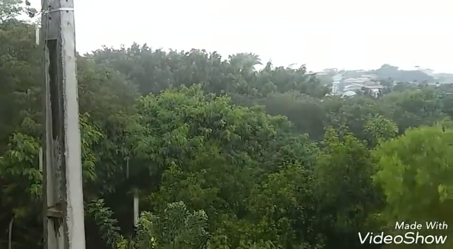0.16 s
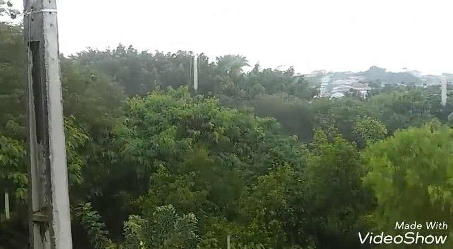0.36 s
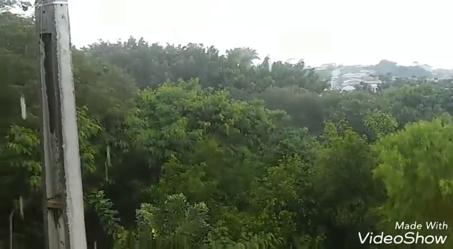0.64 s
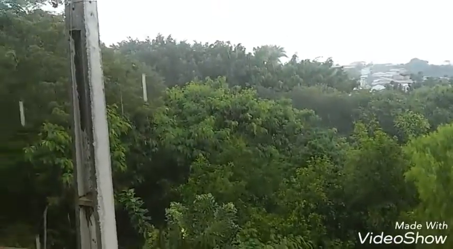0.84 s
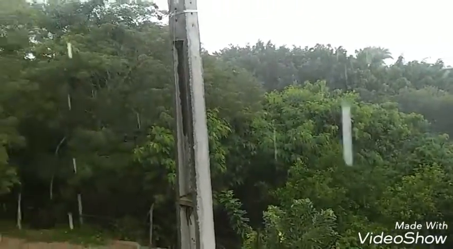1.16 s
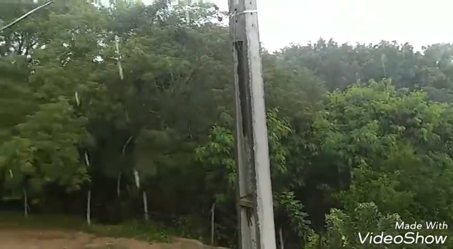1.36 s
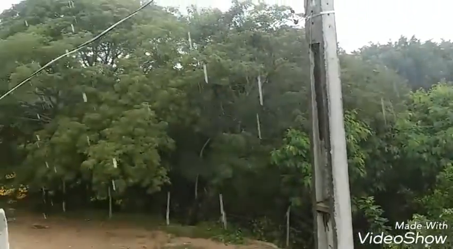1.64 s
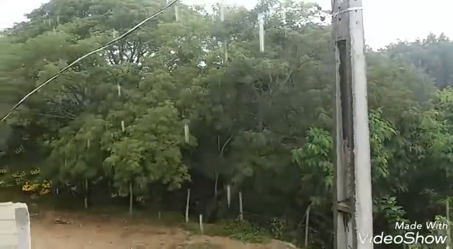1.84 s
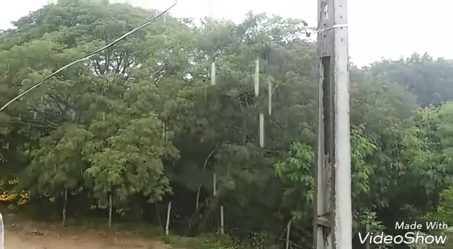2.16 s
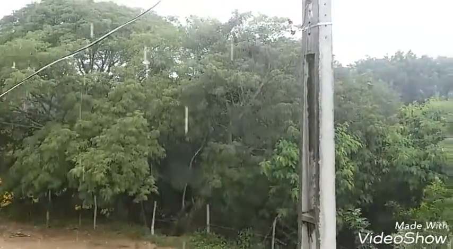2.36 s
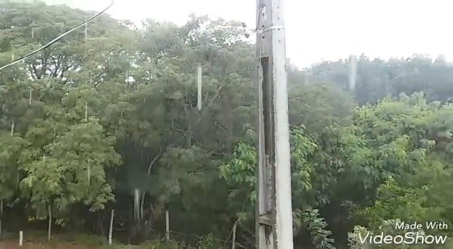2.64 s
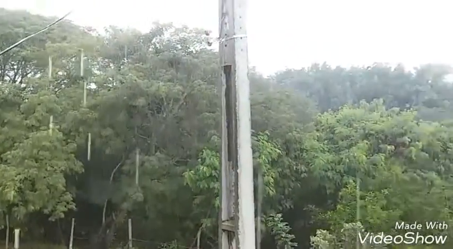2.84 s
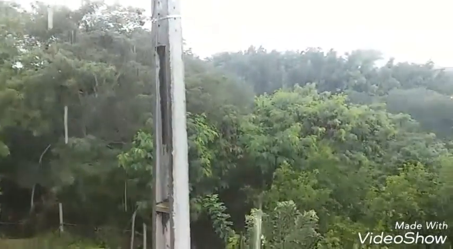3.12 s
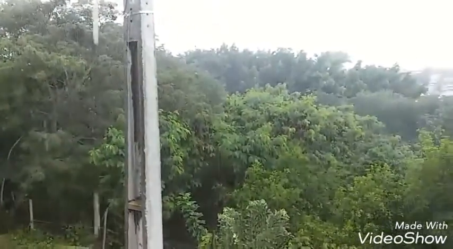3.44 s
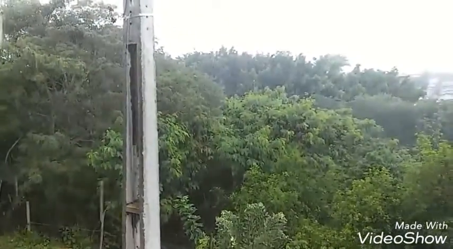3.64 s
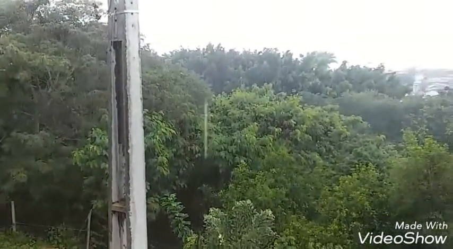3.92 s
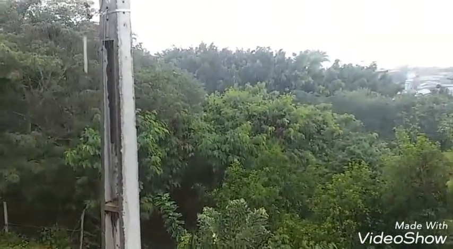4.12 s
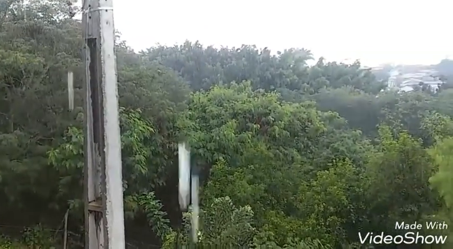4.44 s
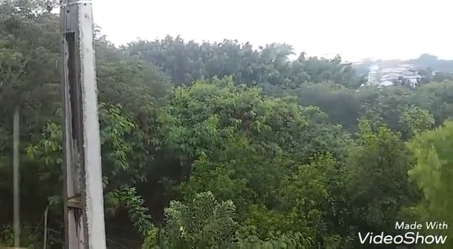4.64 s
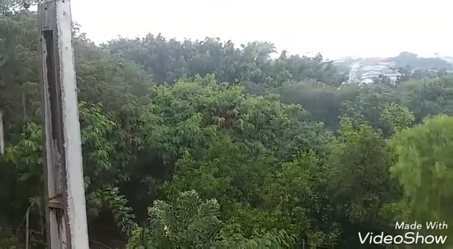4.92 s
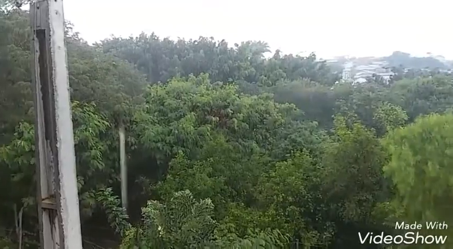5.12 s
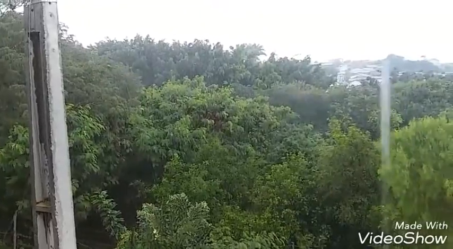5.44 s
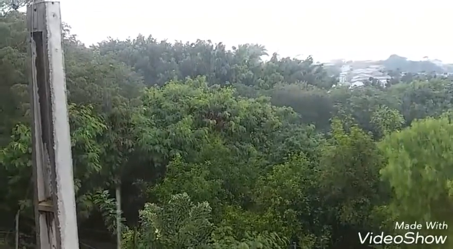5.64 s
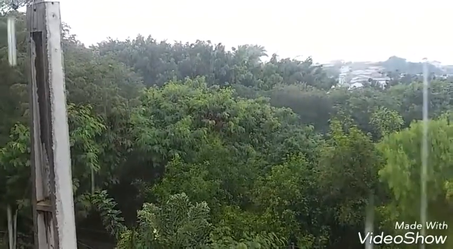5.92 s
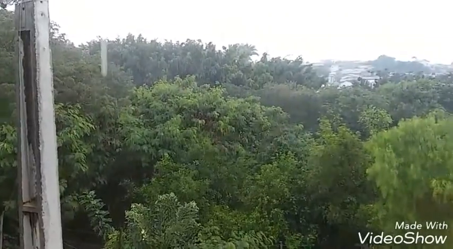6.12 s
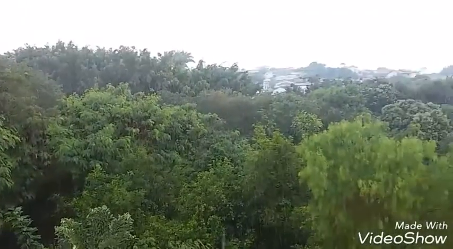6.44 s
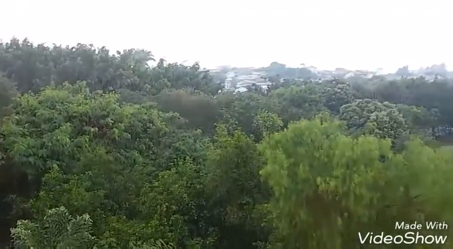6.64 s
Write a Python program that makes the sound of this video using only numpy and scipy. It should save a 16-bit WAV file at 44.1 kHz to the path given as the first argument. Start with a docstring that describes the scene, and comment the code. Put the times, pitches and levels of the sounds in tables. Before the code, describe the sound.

Rainwater pours off the eaves onto paving close to a microphone sheltered under the roof. From the start, a bright sizzling spray surges several times a second, mixed with pattering drops, sharp close ticks and occasional tiny plinks in puddles. Behind it, heavy rain on trees, roofs and a street forms a steady wash, with a gutter gurgling faintly throughout.

Big drops slap and splash irregularly, the sharpest at about 2.6 seconds. After 3 seconds the continuous spray thins, so separate gushes and drops stand out, with clusters of slaps around 3.9, 4.4 and 4.9 to 5.2 seconds, and another hit near 5.9.

Wind rumbles softly on the microphone, most noticeably from 1.4 to 2 seconds and from 3 to 3.5, then more lightly around 5. It calms after 6 seconds, while the rain and dripping carry on to the end, just short of 7 seconds.

```python
"""Rainwater pours off the eaves onto the paving close by, heard in mono from under the roof.
It comes in surges: larger drops patter, and fine droplets sizzle as spray and mist.
Big drops slap and splash, the closest ones tick, and bubbles trapped in puddles plink.
Behind this, heavy rain on trees, roofs and a street blends into a wash, and a gutter gurgles.
Gusts of wind rumble softly on the microphone."""
import sys
import numpy as np
from scipy import signal
from scipy.fft import rfft, irfft, next_fast_len
from scipy.io import wavfile

SR = 44100
rng = np.random.default_rng(int(sys.argv[2]) if len(sys.argv) > 2 else 0)


def persist_wave(psi):
    """Save psi, clipped to +-1, as 16-bit WAV."""
    counts = np.round(np.clip(psi, -1, 1) * 32767).astype(np.int16)
    wavfile.write(sys.argv[1], SR, np.atleast_2d(counts).T)


N = 298557
TIME = np.arange(N) / SR

# The steady stream from the eaves. Each row: time in seconds, level of its spray in dB.
STREAM_LEVELS = [(0.0, -18.5), (0.5, -18), (1.2, -23), (1.65, -21.5), (2.2, -20), (2.72, -18.5),
                 (3.0, -21.5), (3.28, -32.5), (4.2, -29), (4.9, -26), (5.35, -31.5), (5.6, -26.5),
                 (6.2, -41), (6.77, -33)]
# Gushes that spill over the eaves. Each row: start in seconds, then spray, mist and patter levels in dB.
GUSHES = [(.07, -28, -26, -25), (.22, -20.5, -27, -35), (.33, -27, -34, -27), (.79, -22.5, -32, -29),
          (.88, -25, -29, -30), (.98, -21.5, -38, -22.5), (1.06, -30, -35, -25), (1.16, -42, -36, -37),
          (1.27, -17, -44, -48), (1.47, -23.5, -40, -29), (1.72, -35, -32, -23), (1.825, -18, -32, -29),
          (1.96, -22.5, -31, -24), (2.10, -26, -27, -27), (2.39, -27, -34, -24.5), (2.47, -21.5, -34, -23),
          (2.565, -20.5, -25, -36), (2.785, -21, -26, -31), (3.02, -25.5, -40, -20),
          (3.37, -26.5, -47, -50), (3.43, -37, -40, -25), (3.57, -28.5, -33, -29.5), (3.66, -33, -44, -30),
          (3.76, -44, -48, -27), (3.878, -23.5, -36, -24), (3.902, -19, -31, -25), (4.125, -26.5, -32, -26),
          (4.355, -22.5, -38, -20.5), (4.44, -21, -37, -42), (4.55, -28, -30, -28), (4.71, -23, -29, -23),
          (4.78, -26, -36, -26.5), (4.87, -28, -31, -29), (5.01, -22, -31, -30), (5.205, -31, -33, -25),
          (5.31, -57, -39, -28), (5.42, -26.5, -33, -35), (5.64, -49, -33, -25.5), (5.79, -27, -30, -27.5),
          (5.85, -24.5, -30, -39), (6.01, -25.5, -31, -26.5), (6.25, -27, -29, -27), (6.33, -25, -29, -32),
          (6.49, -26, -34, -31), (6.655, -23, -42, -28.5), (6.74, -22, -33, -35)]
# The tone of the bright spray. Each row: frequency in Hz, relative level in dB.
SPRAY_TONE = [(3000, -12.5), (5000, -14), (6500, -8.5), (7800, -3.5), (9000, 0), (10500, -4),
              (12500, -11.5), (15500, -22)]
# The tone of the finest mist. Each row: frequency in Hz, relative level in dB.
MIST_TONE = [(9000, -8), (11500, 2), (13000, 3.5), (15500, -4.5)]
# The tone of the larger, pattering drops. Each row: frequency in Hz, relative level in dB.
PATTER_TONE = [(1300, -10.5), (1800, -16), (2150, -6), (2600, -1.5), (3000, -4), (3600, -6), (4200, -5.5),
               (5000, -8), (7000, -10.5)]
# Big drops hitting wet ground. Each row: start in seconds, peak of the crack in dB, pitch in Hz,
# width in octaves, level of the splash in dB, fade time of the splash in seconds.
BIG_DROPS = [(.235, -19, 3520, 0.32, -31.5, .06), (0.333, -19, 3600, .66, -35, .06),
             (.348, -19, 3900, .9, -35, .07), (0.638, -14, 5800, .35, -27, .05),
             (.8325, -16, 5900, .45, -38, .06), (0.886, -25, 2730, 0.35, -28, 0.095),
             (1.033, -17, 3920, 0.61, -26.5, .07), (1.076, -16, 3900, 1.1, -30, .05),
             (1.169, -27, 2600, 0.37, -29, 0.065), (1.341, -9, 7040, 0.66, -24, 0.066),
             (1.679, -22, 2400, .4, -30, .06), (1.7355, -15, 4700, 0.51, -28, 0.045),
             (1.869, -12, 6100, 0.33, -34, .06), (2.017, -11, 3800, 0.9, -25.5, .04),
             (2.398, -20, 4530, 0.4, -26.5, 0.11), (2.415, -11, 6000, .5, -29, 0.055),
             (2.478, -13, 2890, 0.45, -28.5, 0.068), (2.58, -1.5, 5600, 0.48, -20, 0.046),
             (2.805, -22, 2800, 0.36, -29, 0.054), (3.036, -13, 3600, .6, -29, 0.055),
             (3.066, -22, 3600, 1.1, -35, .06), (3.096, -18, 3300, 1.2, -29.5, 0.055),
             (3.1095, -18, 2580, 1.1, -26, .07), (3.440, -17, 3300, 0.97, -39, .06),
             (3.653, -15, 2800, 0.75, -27, 0.089), (3.914, -13, 4550, 0.52, -25, .07),
             (3.9444, -11, 3900, 0.48, -26, 0.062), (4.349, -16, 5800, .25, -27, .04),
             (4.364, -11, 3000, 0.96, -20.5, 0.041), (4.382, -11, 4000, 1.2, -26, 0.037),
             (4.553, -30, 1700, 0.29, -28.5, 0.078), (4.721, -17, 3300, 1, -27.5, 0.092),
             (4.787, -18, 2300, 0.29, -26.5, 0.079), (4.8885, -7, 2070, 0.72, -21.5, 0.064),
             (4.907, -12, 2160, 0.5, -26, 0.056), (5.0565, -11, 5550, 0.32, -25, 0.044),
             (5.063, -13, 5900, 0.6, -31, 0.088), (5.116, -16, 2800, 0.71, -30, 0.063),
             (5.1292, -20, 2370, 0.7, -32, 0.051), (5.1952, -12, 4750, 0.46, -22.5, 0.05),
             (5.341, -14.5, 4640, .6, -35, .04), (5.4485, -22, 2940, 0.3, -37, .04),
             (5.8529, -10.5, 3050, 0.75, -27, 0.022), (6.258, -15, 3430, 1.1, -32, 0.054),
             (6.285, -29, 2580, 0.3, -31, .08), (6.5105, -24, 2600, 0.3, -37, .07)]
# Drops that trap a bubble in a puddle. Each row: start in seconds, peak in dB, pitch in Hz,
# fade time in seconds.
PUDDLE_BUBBLES = [(1.679, -20, 2290, .004), (1.7357, -13.5, 5000, .002), (2.023, -20, 2830, .004),
                  (2.399, -26, 4210, .004), (3.6535, -14, 2580, .002), (4.3654, -10.5, 3210, .004),
                  (4.721, -24, 5200, .003), (5.0572, -16, 5540, .002), (5.1957, -14, 4460, .002),
                  (5.197, -14, 3950, .003), (5.4485, -21, 2930, 0.0065), (5.8535, -19, 2960, .003),
                  (6.258, -21, 4200, .003), (6.5105, -22.5, 2660, .004)]
# The closest drops. Each row: start in seconds, peak of the click in dB, pitch in Hz.
CLOSE_DROPS = [(.0737, -9, 9300), (.2971, -11, 9300), (.562, -5, 8900), (.5925, -11, 9300),
               (.7353, -16, 9500), (0.7906, -8, 10000), (.8007, -8, 8700), (.8131, -9, 9300),
               (1.0841, -3, 10000), (1.0937, -1, 8200), (1.2027, -15, 9300), (1.279, -5, 8100),
               (1.2984, -7, 8200), (1.4223, -9, 9100), (1.487, -4, 9700), (1.7487, -12, 9300),
               (1.8224, -4, 9400), (1.8567, -8, 9400), (1.9223, -8, 9200), (2.1255, -3, 11000),
               (2.1394, -4, 9500), (2.390, -5, 9400), (2.509, -13, 9300), (2.5617, -3, 8300),
               (2.689, -2, 8800), (2.7031, -5, 9600), (2.992, -6, 8000), (3.4405, -10, 8500),
               (3.749, -10, 9750), (3.9086, -12, 9800), (3.9164, -11, 8000), (4.1647, -10, 8300),
               (4.2826, -10, 8900), (4.381, -10, 8900), (4.4672, 0, 8900), (4.4693, -2, 9200),
               (4.8595, -5, 9800), (4.9492, -8, 9700), (5.0042, -5, 9000), (5.231, -9, 9000),
               (5.2354, -10, 9050), (5.8545, -2, 9100), (5.863, -5, 8700), (6.531, -8, 9400),
               (6.5933, -12, 9400), (6.6728, -6, 8360)]
# How loud the far rain and the gutter are. Each row: time in seconds, relative level in dB.
FAR_RAIN_LEVELS = [(0.0, -37.5), (1.3, -37), (2.3, -37), (3.5, -37.3), (4.1, -38.5), (5.05, -38.5),
                   (5.9, -39.5), (6.3, -37.5), (6.77, -38.5)]
# The tone of the far rain. Each row: frequency in Hz, relative level in dB.
FAR_RAIN_TONE = [(100, -1.5), (190, -5), (280, -5), (380, -6.5), (520, -5), (980, -3), (1270, -8),
                 (1600, -4.5), (2600, -3.5), (4000, -2.5), (6000, -5.5), (9000, -1), (12000, -3.5),
                 (15500, -7)]
# The breeze between gusts, slowly calming. Each row: time in seconds, level in dB.
BREEZE_LEVELS = [(0, -42.5), (2.5, -47), (5.9, -46.5), (6.2, -53), (6.77, -55)]
# Gusts of wind. Each row: start in seconds, time held in seconds, level in dB.
WIND_GUSTS = [(.05, .55, -48), (1.12, .03, -39), (1.2, .01, -35), (1.42, 0.069, -26.5), (1.6, .03, -31),
              (1.7, .07, -32.5), (1.85, 0.038, -36), (1.97, 0.056, -34), (2.15, 0.13, -41),
              (2.42, .25, -37.5), (2.99, 0.091, -33.5), (3.14, 0.033, -29.5), (3.25, 0.07, -29),
              (3.4, 0.06, -33), (3.53, 0.11, -37), (3.67, 0.021, -38), (3.94, 0.05, -42),
              (4.11, 0.046, -39), (4.27, .06, -42), (4.4, .03, -41), (4.76, 0.091, -44),
              (4.86, 0.056, -35.5), (5.02, 0.085, -35), (5.53, .15, -43), (5.78, 0.056, -39)]
# The tone of wind on the microphone. Each row: frequency in Hz, relative level in dB.
WIND_TONE = [(20, -5.5), (35, 5), (55, 2.5), (78, 1.5), (98, 0), (125, -4), (200, -18.5), (350, -25)]


def runoff():
    """Water from the eaves patters on the paving, plinks in puddles and breaks into spray and mist."""
    stream_db = curve(STREAM_LEVELS)
    _, spray_db, mist_db, patter_db = np.transpose(GUSHES)
    spray_gain = gush_gain(stream_db, spray_db, fall_s=0.14)
    mist_gain = gush_gain(stream_db - 9.5, mist_db, fall_s=0.14)
    # The patter follows the stream only a little, and dies away sooner than the fine spray.
    steady_patter_db = -30 + 0.29 * (stream_db - stream_db.mean())
    patter_gain = gush_gain(steady_patter_db, patter_db, fall_s=0.099)

    sizzle = ringing_drops(per_s=5500, spread_db=2, low_hz=4650, high_hz=15000,
                           octaves=0.29, patchy_db=0.7, pitches=8)
    fine_drops = droplets(per_s=14000, spread_db=1) + from_db(-7.5) * sizzle
    fine_drops *= from_db(1.05 * drift(37))   # the spray flickers
    splashes = small_splashes(per_s=200, spread_db=0.35, fall_s=0.028, low_hz=1905, high_hz=6410,
                              octaves=0.32, pitches=11)
    plinks = ringing_drops(per_s=260, spread_db=-0.5, low_hz=1700, high_hz=5800,
                           octaves=0.13, patchy_db=5.5, pitches=14)
    mist = shape_tone(droplets(per_s=5500, spread_db=4), MIST_TONE)
    stray_ticks = unit_power(band(droplets(per_s=77, spread_db=-3.5), hz=9500, octaves=1))
    spray = from_db(-2.5) * shape_tone(fine_drops, SPRAY_TONE) + from_db(-18) * stray_ticks
    patter = from_db(-5.5) * shape_tone(splashes + from_db(-12.5) * plinks, PATTER_TONE)
    return spray_gain * spray + mist_gain * mist + patter_gain * patter


def gush_gain(steady_db, levels_db, fall_s, rise_s=0.012, hold_s=0.055):
    """The loudness of the stream over time, with each gush landing on top of it."""
    events = [(row[0], hold_s, db) for row, db in zip(GUSHES, levels_db)]
    return surges(steady_db, events, rise_s, fall_s)


def small_splashes(per_s, spread_db, fall_s, low_hz, high_hz, octaves, pitches):
    """Each small splash on the paving is a sudden shower of droplets near one pitch that soon fades."""
    out = 0
    kept_per_sample = np.exp(-1 / (fall_s * SR))
    for hz in np.geomspace(low_hz, high_hz, pitches):
        hit_power = droplets(per_s / pitches, spread_db) ** 2 + 1e-18
        fading_power = signal.lfilter([1], [1, -kept_per_sample], hit_power)
        showers = droplets(per_s=900, spread_db=0.5) * np.sqrt(fading_power)
        out += unit_power(band(showers, hz, octaves, order=3)) * np.sqrt(hz)
    return unit_power(out)


def slaps(crack_s=0.00087, splash_rise_s=0.0022, spatter_db=-5, spatter_s=0.038):
    """A big drop cracks and spatters widely, then its splash rains back near the pitch of the crack."""
    out, t = np.zeros(N + SR), TIME[:SR // 3]
    grains = droplets(per_s=2000, spread_db=2)
    for start_s, peak_db, hz, octaves, splash_db, splash_s in BIG_DROPS:
        at = int(start_s * SR)
        shower = grains.take(at + np.arange(len(t)), mode="wrap")
        burst = rng.choice([-1, 1], len(t)) * np.exp(-t / crack_s)
        crack = unit_peak(band(burst, hz, octaves))
        splash = unit_power(band(shower, hz, 1.2 * octaves, order=3))
        splash *= (1 - np.exp(-t / splash_rise_s)) * np.exp(-t / splash_s)
        spatter = unit_power(band(shower[::-1], 1.08 * hz, octaves + 1)) * np.exp(-t / spatter_s)
        splash += from_db(spatter_db) * spatter
        out[at:at + len(t)] += from_db(peak_db) * crack + from_db(splash_db) * splash
    return out[:N]


def ticks(octaves=0.46, crackle_gain=0.087, crackle_s=0.00078, mist_db=-22.5, mist_s=0.044):
    """A close drop on hard ground makes a bright click, an instant of crackle and a puff of mist."""
    out, t = np.zeros(N + SR), TIME[:SR // 8]
    impact = t == 0   # a single-sample spike
    for start_s, peak_db, hz in CLOSE_DROPS:
        at = int(start_s * SR)
        crackle = crackle_gain * rng.standard_normal(len(t)) * np.exp(-t / crackle_s)
        click = unit_peak(band(impact + crackle, hz, octaves))
        mist = unit_power(band(rng.standard_normal(len(t)), hz, octaves)) * np.exp(-t / mist_s)
        out[at:at + len(t)] += from_db(peak_db) * (click + from_db(mist_db) * mist)
    return out[:N]


def bubbles(rows, rise_s=0.00035, glide_per_s=3.1):
    """Each trapped bubble rings briefly, and its pitch climbs as it nears the surface."""
    out, t = np.zeros(N + SR), TIME[:SR // 8]
    for start_s, peak_db, hz, fade_s in rows:
        at = int(start_s * SR)
        cycles = hz * t * (1 + glide_per_s * t / 2)
        ring = np.sin(2 * np.pi * cycles) * (1 - np.exp(-t / rise_s)) * np.exp(-t / fade_s)
        out[at:at + len(t)] += from_db(peak_db) * unit_peak(ring)
    return out[:N]


def far_rain(boost_db=8):
    """Countless distant drops blend into a wash; water running on roofs and street burbles in it."""
    burble = ringing_drops(per_s=9000, spread_db=1, low_hz=170.1, high_hz=2020,
                           octaves=0.16, patchy_db=6, pitches=22)
    drops = droplets(per_s=16000, spread_db=2) + from_db(-5) * burble
    return from_db(curve(FAR_RAIN_LEVELS) + boost_db) * shape_tone(drops, FAR_RAIN_TONE)


def gutter(per_s=70, low_hz=379.5, high_hz=1908, fade_cycles=10.5):
    """Running water gurgles with bubbles at random moments; the large, low ones ring longest."""
    moment, loudness, pitch = rng.random((int(per_s * N / SR), 3)).T
    hz = low_hz * (high_hz / low_hz) ** pitch
    relative_db = -1.5 + 3.5 * (2 * loudness - 1)
    gurgles = bubbles(zip(moment * N / SR, relative_db, hz, fade_cycles / hz))
    return from_db(curve(FAR_RAIN_LEVELS)) * gurgles


def wind():
    """Uneven air pressure rumbles on the microphone; hard gusts add a flutter higher up."""
    strength = surges(curve(BREEZE_LEVELS), WIND_GUSTS, rise_s=0.019, fall_s=0.06)
    pressure = rng.standard_normal(N) * from_db(drift(25))
    rumble = shape_tone(pressure, WIND_TONE)
    flutter = unit_power(band(rng.standard_normal(N), hz=138, octaves=1.05))
    return strength * rumble + strength ** 2 * from_db(18.5) * flutter


def droplets(per_s, spread_db):
    """Tiny hits at random moments. A positive spread makes a few louder, a negative one a few softer."""
    moment, size, sign = rng.random((int(per_s * N / SR), 3)).T
    size_db = spread_db * np.minimum(-np.log(1 - size), 4)
    hits = from_db(size_db) * np.sign(sign - .5)
    return unit_power(np.bincount((moment * N).astype(int), hits, N))


def ringing_drops(per_s, spread_db, low_hz, high_hz, octaves, patchy_db, pitches):
    """Drops that each ring briefly at one of many pitches; every pitch swells and fades by itself."""
    out = 0
    for hz in np.geomspace(low_hz, high_hz, pitches):
        rings = unit_power(band(droplets(per_s / pitches, spread_db), hz, octaves))
        swell = from_db(patchy_db * np.minimum(drift(10), 1))
        out += rings * np.sqrt(hz) * swell
    return unit_power(out)


def surges(steady_db, events, rise_s, fall_s):
    """A loudness curve: a steady level plus surges that rise, hold and die away. Their powers add up."""
    power = from_db(steady_db) ** 2
    for start_s, hold_s, db in events:
        age = TIME - start_s
        rise = np.clip(age / rise_s, 0, 1)
        fall = np.exp(-np.clip((age - rise_s - hold_s) / fall_s, 0, 20))
        power += (from_db(db) * rise * fall) ** 2
    return np.sqrt(power)


def drift(rate_hz, step=40, warm_up=2000):
    """A smooth random wobble, about 1 in size; a higher rate makes it wobble faster."""
    pole = np.exp(-2 * np.pi * rate_hz * step / SR)
    noise = rng.standard_normal(N // step + warm_up + 2)
    smooth = signal.lfilter([1], [1, -2 * pole, pole * pole], noise)[warm_up:]
    return np.interp(np.arange(N) / step, np.arange(len(smooth)), unit_power(smooth))


def shape_tone(x, tone, edge_db_per_octave=18):
    """Filter a sound by a tone table, falling away beyond its ends. The result has a power of 1."""
    size = next_fast_len(N + SR // 4)
    log_hz = np.log2(np.maximum(np.arange(size // 2 + 1) * SR / size, 1))
    hz, db = np.transpose(tone)
    octaves_outside = np.abs(log_hz - np.clip(log_hz, np.log2(hz[0]), np.log2(hz[-1])))
    gain_db = np.interp(log_hz, np.log2(hz), db) - edge_db_per_octave * octaves_outside
    # Make the filter ring only after each hit, never before it (minimum phase).
    cepstrum = irfft(np.log(from_db(gain_db)), size)
    cepstrum[1:size // 2] *= 2
    cepstrum[size // 2 + 1:] = 0
    response = np.exp(rfft(cepstrum))
    return unit_power(irfft(rfft(x, size) * response, size)[:N])


def band(x, hz, octaves, order=2):
    """Keep the frequencies around hz, in a band this many octaves wide."""
    edges = np.clip(hz * 2 ** (np.array([-.5, .5]) * octaves), 10, .47 * SR)
    return signal.sosfilt(signal.butter(order, edges, "band", fs=SR, output="sos"), x + 1e-18)


def curve(rows):
    """Join (time, level) points with straight lines, giving a level for every sample."""
    return np.interp(TIME, *np.transpose(rows))


def from_db(db):
    """Turn decibels into a number to multiply by."""
    return 10 ** (np.asarray(db) / 20)


def unit_power(x):
    """Scale a sound so its average power is 1."""
    return x / np.sqrt(np.mean(x ** 2) + 1e-20)


def unit_peak(x):
    """Scale a sound so its largest peak is 1."""
    return x / np.abs(x).max()


def scene():
    """Everything reaches one microphone, so both channels are the same."""
    near_drops = slaps() + bubbles(PUDDLE_BUBBLES) + ticks()
    background = far_rain() + gutter()
    return np.tile(runoff() + near_drops + background + wind(), (2, 1))


def record(dry):
    """Round off the highest peaks and cut the very top of the treble steeply."""
    ceiling, cutoff_hz = 0.8, 15750
    rounded = dry / (1 + (dry / ceiling) ** 6) ** (1 / 6)
    return signal.sosfilt(signal.ellip(12, .1, 90, cutoff_hz, fs=SR, output="sos"), rounded)


dry = scene()
out = record(dry)
persist_wave(out)
```